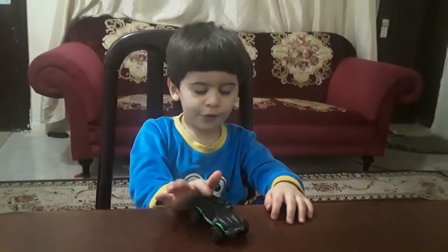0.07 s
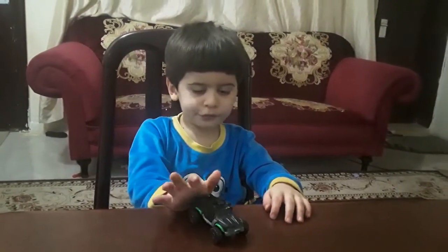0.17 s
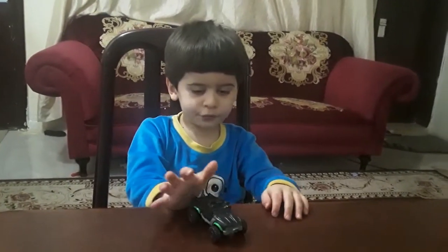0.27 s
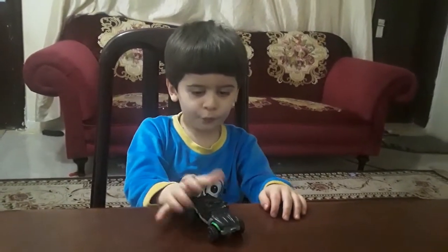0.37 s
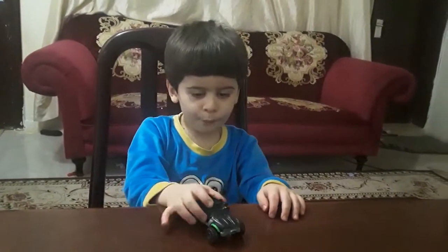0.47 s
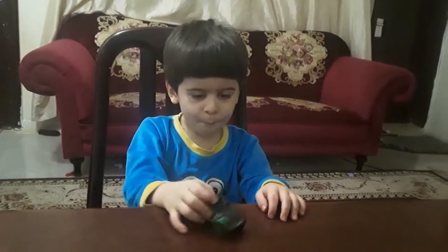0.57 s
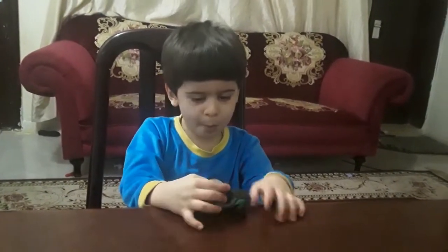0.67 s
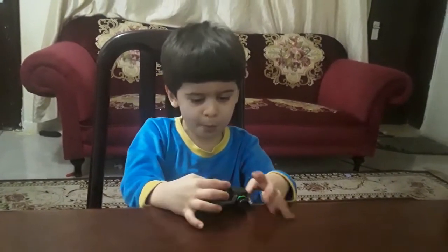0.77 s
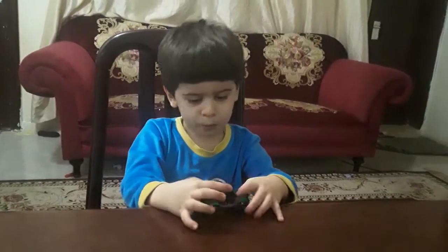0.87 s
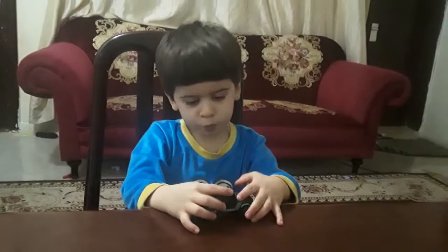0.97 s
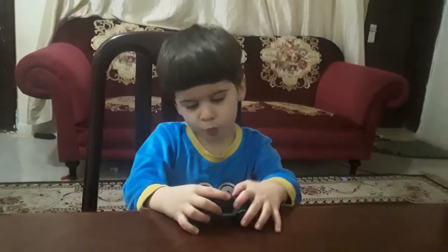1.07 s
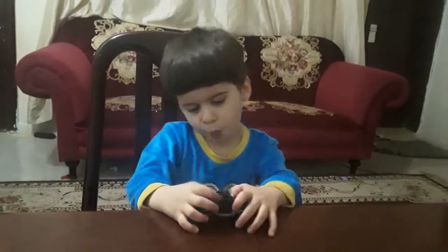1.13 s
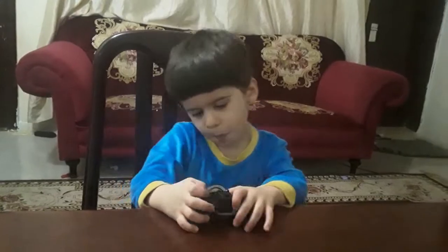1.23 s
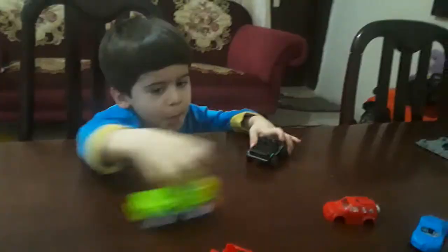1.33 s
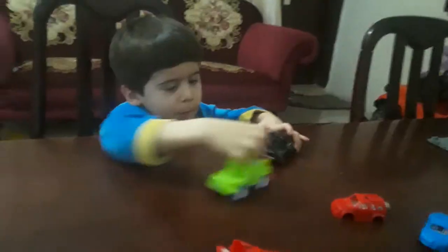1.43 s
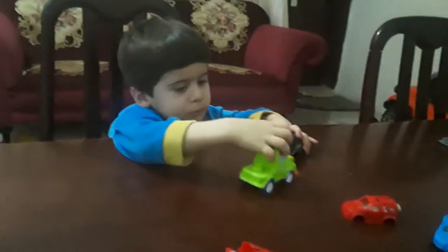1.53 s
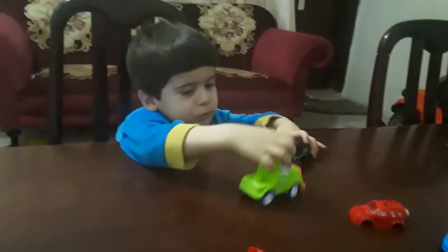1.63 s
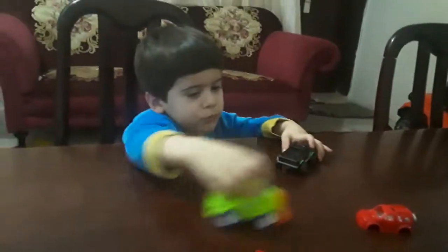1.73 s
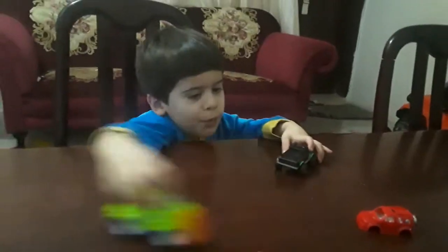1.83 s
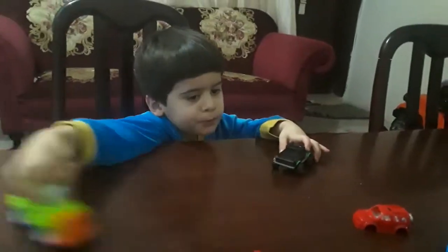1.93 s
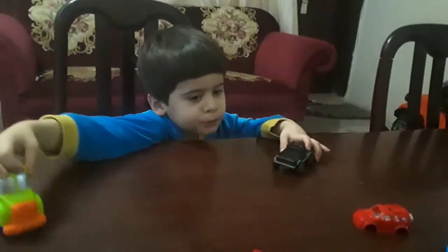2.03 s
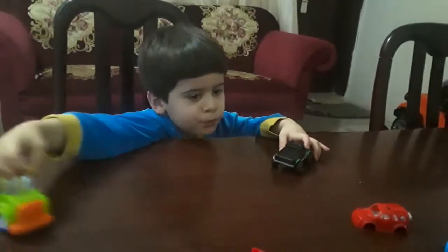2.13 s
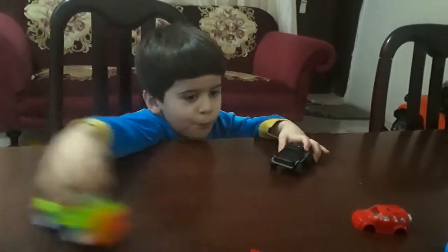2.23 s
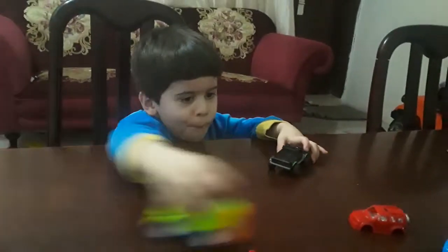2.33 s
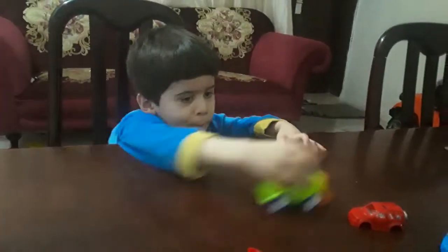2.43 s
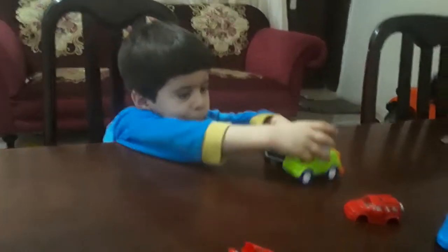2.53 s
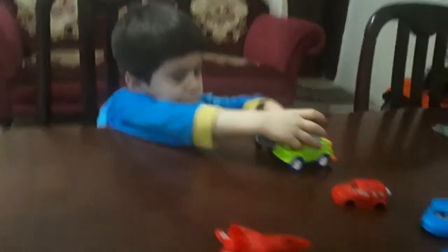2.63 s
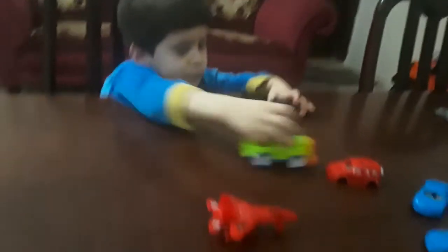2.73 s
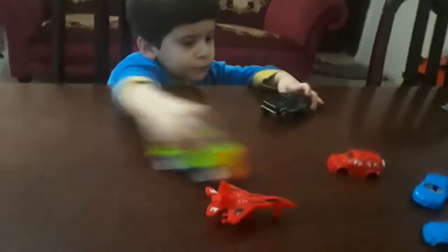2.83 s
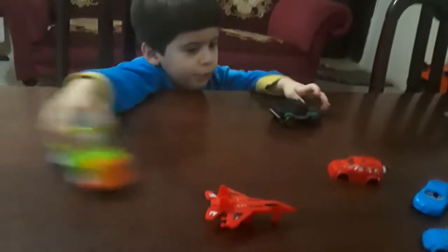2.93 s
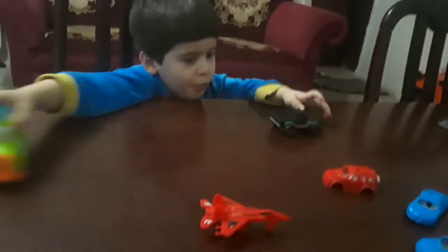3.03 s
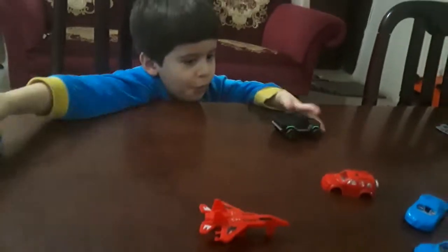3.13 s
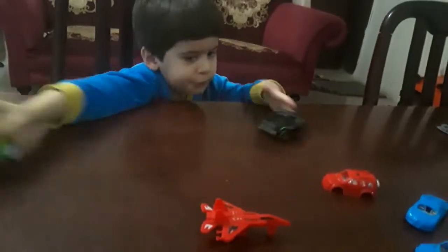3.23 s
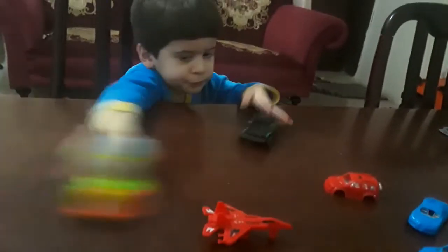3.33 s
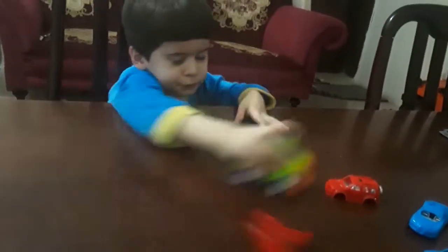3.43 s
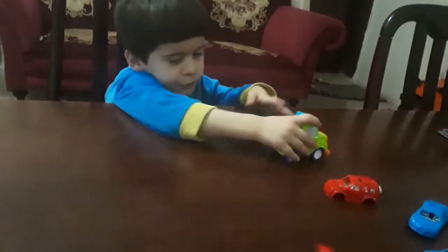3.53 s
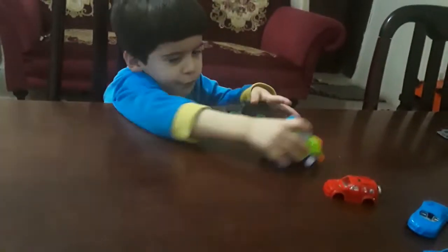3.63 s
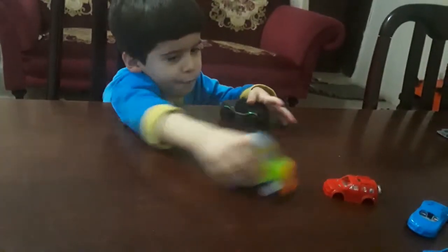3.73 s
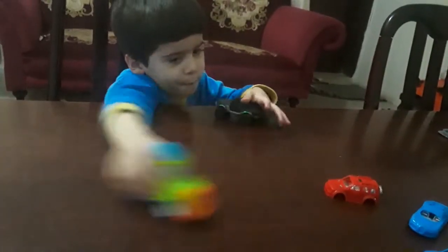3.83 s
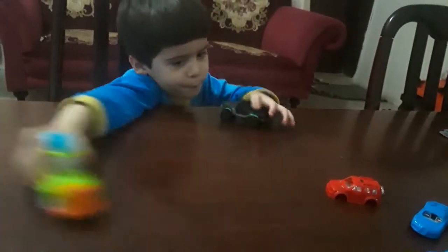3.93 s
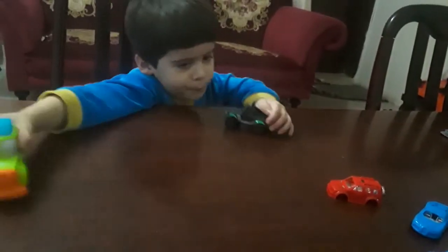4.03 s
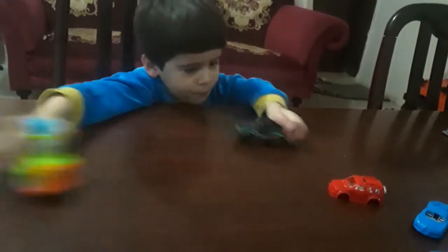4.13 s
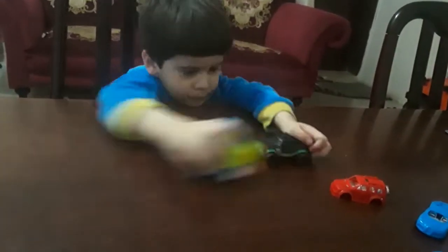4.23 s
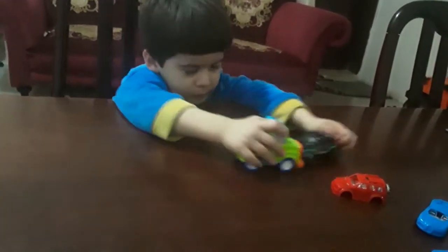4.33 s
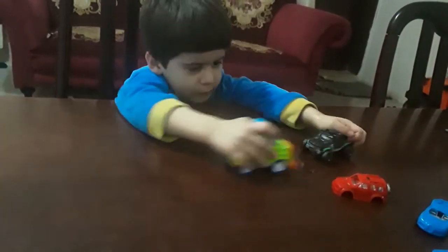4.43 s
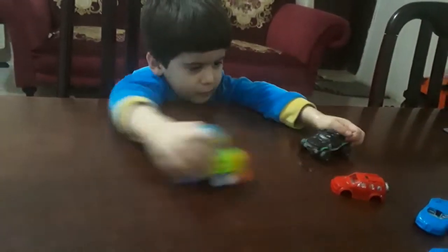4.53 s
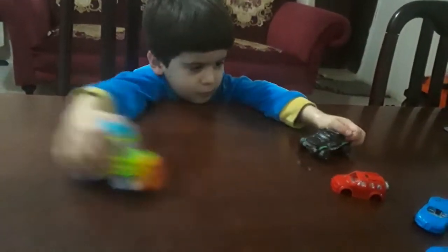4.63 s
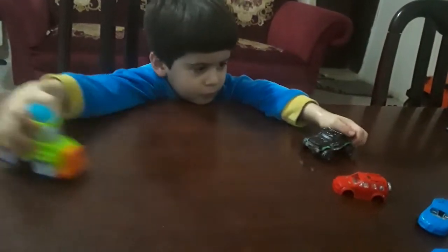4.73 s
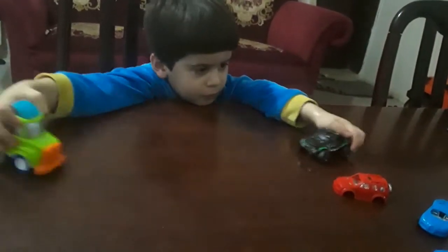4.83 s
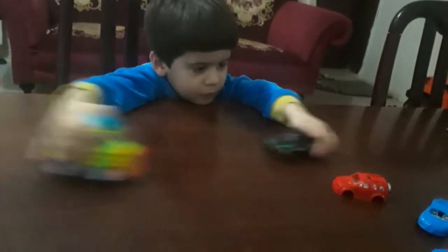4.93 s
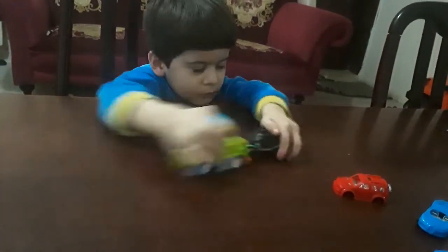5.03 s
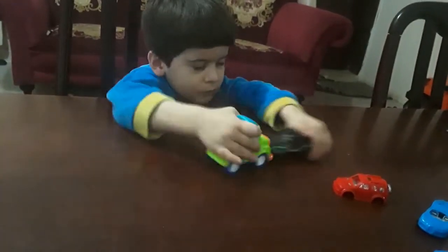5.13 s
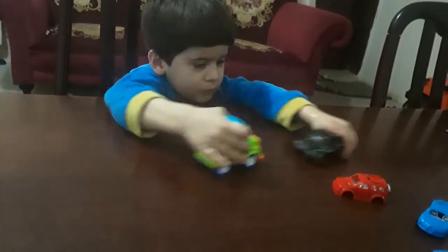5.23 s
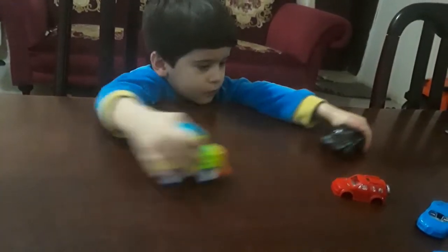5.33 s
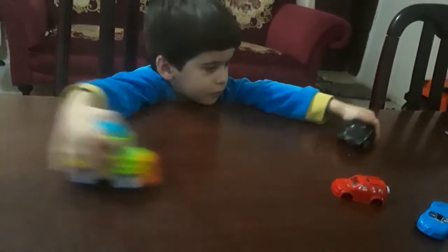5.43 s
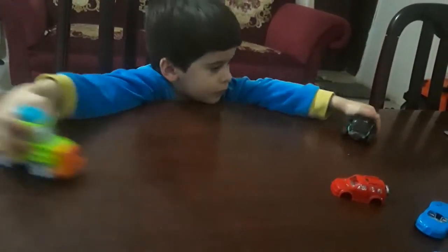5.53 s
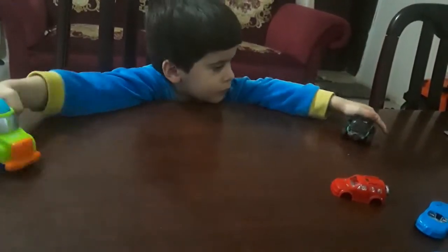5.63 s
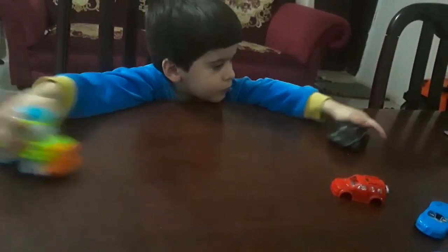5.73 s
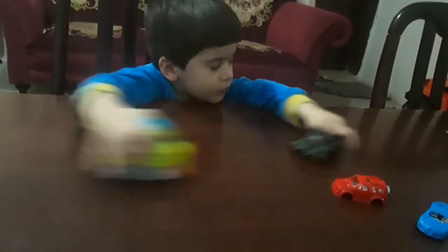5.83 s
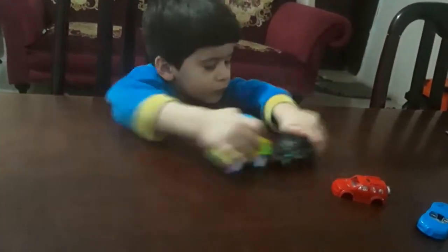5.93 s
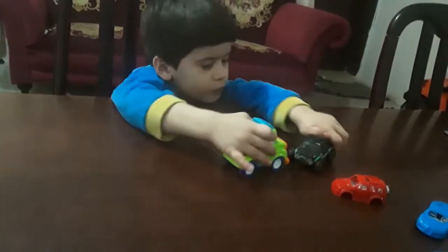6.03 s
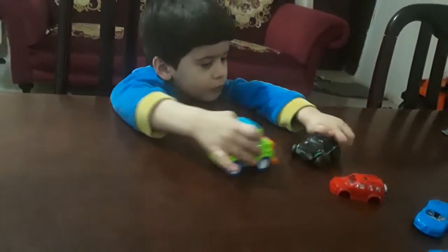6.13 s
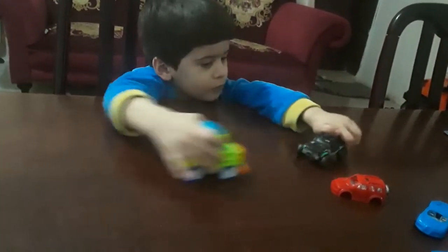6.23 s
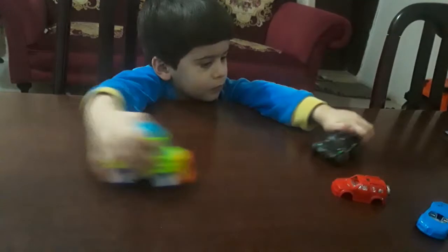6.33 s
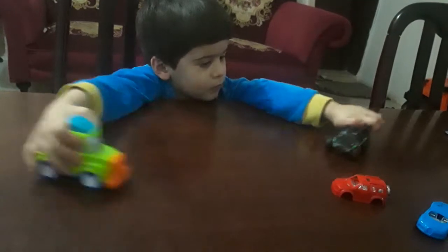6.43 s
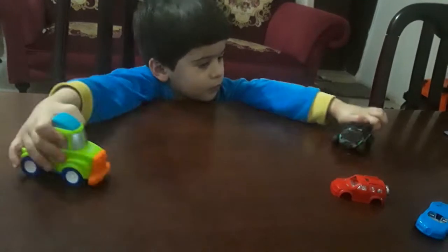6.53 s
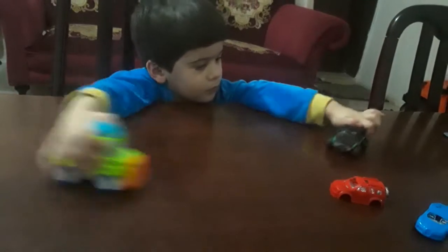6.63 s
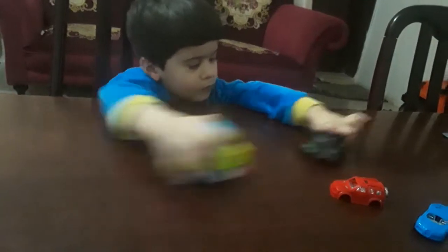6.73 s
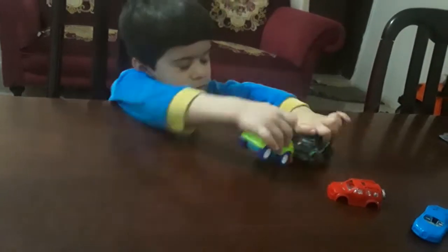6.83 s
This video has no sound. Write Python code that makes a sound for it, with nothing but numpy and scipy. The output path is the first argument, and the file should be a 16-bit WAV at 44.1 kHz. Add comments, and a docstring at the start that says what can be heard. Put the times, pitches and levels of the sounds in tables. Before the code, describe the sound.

Light clicks and faint scuffs come from fingers fiddling with a small toy car. Then, abruptly, a plastic toy truck is rolling, shoved back and forth over a wooden table. Its wheels scrape and its gears whirr, ringing the hollow shell and the tabletop, and the harder shoves end in sharp knocks and rattles. A phone picks it up close by in a living room, with a short echo and a faint hum.

```python
"""First come light clicks and scuffs: a child fiddles with a small toy car in a living room.
Then, abruptly, a plastic truck is heard rolling, shoved back and forth over a wooden table. Its
wheels and gears make lots of tiny hits, which set the hollow shell and the table top ringing.
At the end of the harder shoves the truck knocks and rattles.
A phone close by hears it with a short echo over a faint hum."""
import sys
import numpy as np
from scipy import signal
from scipy.fft import rfft, irfft
from scipy.io import wavfile
from scipy.ndimage import map_coordinates

SR = 44100
rng = np.random.default_rng(int(sys.argv[2]) if len(sys.argv) > 2 else 0)


def to_wav(sig):
    """Store sig (one row per channel, or 1-D mono) as 16-bit WAV at the path in sys.argv[1].

    Samples outside -1..1 are clipped; the rate is SR.
    """
    pcm = np.clip(np.atleast_2d(sig), -1, 1) * 32767
    pcm = np.round(pcm).astype(np.int16)
    wavfile.write(sys.argv[1], SR, pcm.T)  # frames by channels


N = 303849
TIME = np.arange(N) / SR
FFT_SIZE = 8192
FREQ = np.maximum(np.arange(FFT_SIZE // 2 + 1) * SR / FFT_SIZE, 1)

# Shoves of the truck. Each row: start, swell time and fade time in seconds, level in dB, then
# in dB how much to favour table rumble, grit, gear whirr, cab ring, deep table notes,
# wheel sizzle and the small gear.
SHOVES = [(1.375, 0.0031, .18, -21, -8.5, -11, 2.5, -22, 0, -35, -6),
          (1.582, 0.31, 0.19, -29.5, -7, -23, 2, -5, -1, -9, -3.5),
          (2.175, 0.19, 0.24, -25, -6.5, -13.5, -1.5, -7.5, 2.5, -7, -11),
          (2.659, 0.18, 0.43, -34, -9.5, -5.5, -5, 0, 0.5, 2.5, 4),
          (3.201, .21, .1, -21, -21, -4.5, -11, -1, 4, -17, 7),
          (3.493, .015, .17, -23.5, -19, -3, -10, -1.5, 1, -5, -4),
          (3.66, 0.18, 0.25, -40.5, -14, -1, -1, -1.5, -15, 3, -2),
          (4.059, 0.19, 0.41, -34.5, -10, -6, -7, -1, -5.5, -1.5, 1),
          (4.479, 0.27, 0.11, -37.5, -12, -1, 5, -2, -5.5, -14, -7),
          (4.904, 0.081, 0.35, -25, -13, -5, -2.5, -18, -4.5, -14, 0),
          (5.31, 0.14, 0.26, -35, -15, -3, 5.5, -5.5, -13, -9, -9),
          (5.714, .17, 0.18, -21.5, -7.5, -6.5, -8, -12.5, -8, -13, 1.5),
          (6.178, .21, 0.25, -34, -11, -4.5, -2.5, -13, -6.5, -17, -3.5),
          (6.643, 0.16, 0.31, -23, -8, -5, -3.5, -20, -11, -20, -3)]
# The truck hits the table or another toy. Each row: time in seconds, level in dB,
# pitch in Hz of the part that rings most, rattle compared with the blow in dB.
TRUCK_KNOCKS = [(2.825, -14, 5210, -23), (3.372, -2.5, 2550, 0), (3.411, -0.5, 6460, -5),
                (3.4955, -1.5, 6150, -4.5), (3.503, -4, 2320, -1.5), (4.2904, -5, 5130, -7),
                (4.3, -6, 5070, -2.5), (4.388, -11, 2820, -9.5), (5.079, -2.5, 3670, -7),
                (5.961, -1, 2360, -5.5), (6.824, 0.5, 2900, -21), (6.835, -6, 4360, -5),
                (6.842, -7, 2640, -2.5)]
# Scuffs of the small car. Each row: start, swell time and fade time in seconds, level in dB.
CAR_SCUFFS = [(0.444, 0.026, 0.16, -42.5), (.575, 0.016, 0.39, -37), (.72, 0.02, 0.13, -35.5),
              (.86, 0.041, 0.057, -43.5), (1.074, 0.024, 0.18, -41.5)]
# Short, sharp sounds. Each row: start in seconds, level in dB, pitch in Hz, width in Hz.
# The one at 1.378 seconds is the sharp onset as the rolling truck is suddenly heard.
SHARP_CLICKS = [(0.022, -37.5, 5940, 700), (.1174, -47.5, 5100, 1500), (0.4224, -40, 6200, 700),
                (0.4615, -27, 3300, 2550), (0.488, -34, 5000, 3000), (0.519, -33, 3020, 2000),
                (0.5925, -28, 4760, 3000), (0.7417, -20.5, 3300, 1400), (0.7486, -15, 3130, 1820),
                (0.809, -19, 3240, 990), (1.0972, -32, 3580, 1210), (1.1253, -34.5, 2220, 1640),
                (1.231, -41, 2460, 1300), (1.378, -13.5, 2420, 1317), (1.6582, -46, 2280, 678),
                (1.702, -29, 2370, 800), (1.87, -30, 2960, 2500), (1.883, -17.5, 2600, 1480),
                (2.5937, -27.5, 3170, 1380), (3.203, -21.5, 3480, 180), (3.2413, -21, 3550, 141),
                (3.2813, -27, 4000, 2400), (3.661, -18.5, 3070, 1800), (4.671, -33, 2600, 300),
                (5.028, -21, 4600, 1490), (5.4123, -26.5, 4800, 596), (6.487, -31, 11900, 6000),
                (6.337, -28, 4900, 500), (6.663, -30, 2800, 2020)]
# Dull taps. Each row: start in seconds, level in dB, pitch in Hz.
DULL_TAPS = [(1.606, -28.5, 480), (2.702, -16.5, 800)]

# The notes each part rings at. Each row: pitch in Hz, width in Hz, strength in dB.
# A narrow note rings longer than a wide one.
SHELL_NOTES = [(1060, 43, 1.5), (1390, 18, -9), (1210, 25, 15), (1734, 330, 1.5), (2500, 120, -1),
               (2680, 250, -0.5), (3525, 170, 1), (4237, 124, 3.5), (5080, 160, -4.5), (5300, 120, -3)]
CAB_NOTES = [(1231, 147, -5), (1345, 93, 15), (1360, 39, -7.5)]
LARGE_GEAR_NOTES = [(2238, 49, -1.5), (2399, 71, 3.5), (2656, 130, -1), (2844, 45, 1.5)]
SMALL_GEAR_NOTES = [(4630, 420, 1), (4740, 130, -2.3)]
DEEP_TABLE_NOTES = [(116, 20, 3), (165, 29, -1), (203.5, 51, 1), (310, 34, -3.5)]
HIGH_TABLE_NOTES = [(333, 10.2, 7.8), (495, 65, 2.5), (823, 37, 3.7)]
CAR_NOTES = [(482, 12, 5.5), (970, 350, 5.9), (1680, 120, 6.4), (3700, 260, 0.51)]

# How dull or bright each thing sounds. Each row: frequency in Hz, strength there in dB.
SHELL_TONE = [(60, -43.5), (400, -18.5), (700, -9.5), (1100, -3.5), (2000, -1.5), (3500, -3.5), (5000, -9),
              (6200, -36), (9000, -18), (16000, -26.5)]
GRIT_TONE = [(500, -63), (3500, -46), (5500, 4.5), (9000, -7.5), (16000, 2)]
KNOCK_TONE = [(30, -13), (80, -10.5), (300, -17.5), (550, -8.5), (900, -19.5), (1300, -4.5), (2500, -1),
              (4500, 1.5), (6200, -0.5), (9000, -4), (16000, 1.5)]
CAR_TONE = [(80, -5), (250, -5.5), (480, -1), (750, -8), (1650, 0.5), (2200, 0.5), (3400, -1.5),
            (4500, -15), (6500, -4.5), (16000, -22)]
AIR_TONE = [(30, -13), (150, 1.5), (480, -7.5), (1200, -12.5), (1870, -9.5), (3700, -19.5), (5200, -17),
            (15000, -19)]
MICROPHONE_TONE = [(30, -35), (100, 0.5), (5800, -2), (6700, -7.5), (7800, -17.5), (9400, -25),
                   (11500, -17), (13000, -16.5), (16000, -30.5)]

# An appliance hums. Each row: pitch in Hz, average level in dB, end time in seconds.
APPLIANCE_HUM = [(150.7, -65, 8.3), (710, -68, 1.3)]


def truck(hits_per_s=1900, bumps_per_s=70, spread_db=4, judder_db=2.08):
    """Wheels scrape and gears chatter, faster when pushed harder; shell, cab and table ring along."""
    level, rumble, grit, whirr, hollow, deep, sizzle, shrill = shoves()
    speed = np.sqrt(level / np.mean(level))
    rate = hits_per_s * speed

    def rolling(tone):
        """Fresh tiny hits ring one part."""
        return ring(chatter(rate, spread_db), tone)

    # loose axles jump in their slots now and then, over the fine scrape
    wheels = chatter(rate, spread_db) + undb(-8) * chatter(bumps_per_s * speed, spread_db / 2)
    shell = ring(wheels, slope(SHELL_TONE) * np.hypot(1, peaks(SHELL_NOTES)))
    cab = rolling(peaks(CAB_NOTES) ** 0.62)
    body = changing_grip(shell + hollow * cab, bend=0.035, rate=3)
    large_gear = rolling(peaks(LARGE_GEAR_NOTES) ** 1.2)
    small_gear = rolling(peaks(SMALL_GEAR_NOTES) ** 1.2)
    gears = changing_grip(large_gear + shrill * small_gear, bend=0.012, rate=4)
    hiss = ring(chatter(rate / 2, spread_db), slope(GRIT_TONE))
    # the table shares the push between its deep and its higher notes
    wood = slope([(50, 9), (110, -4), (850, 5.5), (2500, -46)])
    low = rolling(wood * peaks(DEEP_TABLE_NOTES))
    high = rolling(wood * peaks(HIGH_TABLE_NOTES))
    table = (deep * low + high) / np.hypot(deep, 1)
    # slow wheels rumble, fast ones hiss
    sound = undb(-1) * (body + rumble * speed ** -0.62 * table + grit * speed ** 0.97 * hiss)
    sound += undb(-2) * whirr * gears
    # the hand never presses evenly
    sound *= level * undb(judder_db * wander(rate=70))
    # wheels that slide sideways sizzle, even under a light hand
    slide = undb(-40) * sizzle * speed ** 1.8 * rolling(peaks([(13400, 7400, 0)]) ** 2)
    return (sound + slide) * (TIME >= SHOVES[0][0])


def shoves(rest_db=-56.5):
    """The truck's loudness over time, then its seven mix amounts, blended from shove to shove."""
    pushes = np.array([push(*row[:4]) for row in SHOVES])
    share = (pushes + 1e-9) / np.sum(pushes + 1e-9, axis=0)
    mix = undb(np.array(SHOVES)[:, 4:]).T @ share
    # the hand never lets the truck rest entirely
    level = np.hypot(np.linalg.norm(pushes, axis=0), undb(rest_db))
    return level, *mix


def push(start, swell_s, fade_s, db, bite_db=-17, fade_db=-20.5):
    """Loudness of one push of the hand: the wheels bite, speed up, then slow down."""
    age = TIME - start
    bite = np.clip(age / (0.054 * swell_s), 0, 1)
    swell_left = np.clip(1 - age / swell_s, 0, 1) ** 1.75
    fade = np.clip((age - swell_s) / fade_s, 0, 4) ** 1.806
    return bite * undb(db + bite_db * swell_left + fade_db * fade)


def changing_grip(x, bend, rate):
    """The grip keeps changing, which bends the notes up and down (0.01 is about one percent)."""
    position = np.cumsum(1 + bend * wander(rate))
    return map_coordinates(x, [position], order=3, mode="mirror")


def knocks(contact_s=0.0024, rattle_s=0.034, thud_hz=57, thud_s=0.13):
    """Parts clash for an instant, then loose axles rattle; the shell rings and the table thuds."""
    out, t = np.zeros(N), TIME[:SR // 2]
    body = slope(KNOCK_TONE) * np.hypot(1, peaks(SHELL_NOTES))
    thud = np.sin(2 * np.pi * thud_hz * t) * np.exp(-t / thud_s)
    for start, db, hz, rattle_db in TRUCK_KNOCKS:
        clash, loose = rng.choice([-1, 1], (2, len(t)))
        blow = clash * (t / contact_s * np.exp(1 - t / contact_s)) ** 2
        # loose parts bounce in short bunches
        bounces = unit(undb(5.8 * wander(rate=307)[:len(t)]))
        rattle = loose * bounces * np.exp(-t / rattle_s) * undb(rattle_db)
        part = np.hypot(1, peaks([(hz, hz / 7, 5)]))
        add(out, start - contact_s, undb(db - 1) * ring(blow + rattle, body * part))
        add(out, start, undb(db - 56) * thud)
    return out


def small_car():
    """Little wheels scuff under the fingers and ring the car's small body."""
    level = np.linalg.norm([push(*row) for row in CAR_SCUFFS], axis=0)
    body = slope(CAR_TONE) * np.hypot(1, peaks(CAR_NOTES))
    return level * ring(chatter(rate=1500, spread_db=4.5), body)


def clicks(fade_s=0.0051):
    """Sharp clicks: very short bursts of noise, each ringing at its own note."""
    out, t = np.zeros(N), TIME[:FFT_SIZE]
    for start, db, hz, width in SHARP_CLICKS:
        burst = rng.choice([-1, 1], len(t)) * np.exp(-t / fade_s)
        tone = peaks([(hz, width, 0), (6200, 1200, -19)]) ** 1.18
        add(out, start, undb(db) * ring(burst, tone))
    return out


def taps():
    """Soft bumps that die away within a few vibrations."""
    out, t = np.zeros(N), TIME[:FFT_SIZE]
    for start, db, hz in DULL_TAPS:
        age = t * hz / 0.54
        rise_and_fall = age * np.exp(1 - age * 1.2)
        add(out, start, undb(db) * np.sin(2 * np.pi * hz * t) * rise_and_fall)
    return out


def room(x):
    """The toys keep moving, so each short stretch of sound gets its own pattern of echoes."""
    out, fade = np.zeros(N + FFT_SIZE), signal.get_window("hann", FFT_SIZE)
    half = FFT_SIZE // 2
    padded = np.pad(x, (half, FFT_SIZE))
    for i in range(0, N + half, half):
        add(out, i / SR, signal.fftconvolve(padded[i:i + FFT_SIZE] * fade, echoes()))
    return out[half:half + N]


def echoes(low_fade_s=0.46, high_fade_s=0.2, delay_s=0.0045, build_s=0.0037, echo_db=-6):
    """Direct sound, quick bounces off table and hand, then a wash of echoes whose highs die first."""
    t = TIME[:SR * 6 // 10]
    noise = rng.standard_normal(len(t))
    low = signal.sosfilt(signal.butter(1, 3000, fs=SR, output="sos"), noise)
    tail = low * undb(-60 * t / low_fade_s) + (noise - low) * undb(-60 * t / high_fade_s)
    tail *= 1 - np.exp(-np.maximum(t - delay_s, 0) / build_s)
    near_bounces = undb(-21) * noise * np.exp(-t / 0.0021)
    response = undb(echo_db) * tail / np.linalg.norm(tail) + near_bounces
    response[0] = 1  # the direct sound
    return response / np.linalg.norm(response)


def background(air_db=-60):
    """The soft hush of room air and an appliance's slightly wavering hum."""
    sound = undb(air_db + 2 * wander(rate=5.35)) * ring(rng.standard_normal(N), slope(AIR_TONE))
    for hz, db, end in APPLIANCE_HUM:
        phase = 2 * np.pi * hz * TIME + 0.2 * wander(rate=11)
        sound += undb(db) * np.sqrt(2) * np.sin(phase) * (TIME < end)
    return sound


def chatter(rate, spread_db):
    """Tiny random hits of uneven size, about `rate` of them a second."""
    hit = rng.random(N) < rate / SR
    size = undb(spread_db * np.clip(rng.standard_normal(N), -2, 2)) * rng.choice([-1, 1], N)
    return unit(hit * size / np.sqrt(rate))


def ring(x, tone):
    """Send x through an object with this tone; plain white noise keeps its power."""
    # these steps make the ringing come after each hit, never before it
    cepstrum = irfft(np.log(unit(tone) + 1e-6))
    cepstrum[1:FFT_SIZE // 2] *= 2
    cepstrum[FFT_SIZE // 2 + 1:] = 0
    response = irfft(np.exp(rfft(cepstrum)))
    return signal.fftconvolve(x, response)[:len(x)]


def slope(points):
    """A broad tone: the strength at every frequency, from a line through (Hz, dB) points."""
    hz, db = np.transpose(points)
    return undb(np.interp(np.log(FREQ), np.log(hz), db))


def peaks(notes):
    """A ringing tone: the strength at every frequency, with a peak at each note."""
    powers = (undb(db) ** 2 / (1 + ((FREQ - hz ** 2 / FREQ) / width) ** 2) for hz, width, db in notes)
    return np.sqrt(sum(powers))


def wander(rate):
    """A random wobble of size about 1 that heads for a new value `rate` times a second."""
    values = rng.standard_normal(4096)
    return unit(np.interp(TIME * rate, np.arange(len(values)), values))


def undb(db):
    """Turn decibels into a number to multiply by."""
    return 10 ** (np.asarray(db) / 20)


def unit(x):
    """Scale x to an average power of 1."""
    return x / np.sqrt(np.mean(x ** 2) + 1e-18)


def add(out, start, sound):
    """Mix a sound in at its start time."""
    i = max(round(start * SR), 0)
    out[i:i + len(sound)] += sound[:len(out) - i]


def scene():
    """Toys and table in the room, the same in both channels."""
    mono = room(truck() + small_car() + knocks() + clicks()) + taps() + background()
    return np.array([mono, mono])


def record(dry, top_hz=15950):
    """The phone's microphone hole dulls the highs near 9 kHz; peaks are capped and the top is cut."""
    tone = slope(MICROPHONE_TONE)
    sound = np.array([ring(channel, tone) for channel in dry]) * np.sqrt(np.mean(tone ** 2))
    top_cut = signal.ellip(10, 0.2, 90, top_hz, fs=SR, output="sos")
    return signal.sosfilt(top_cut, np.clip(sound, -1, 1))


dry = scene()
out = record(dry)
to_wav(out)
```